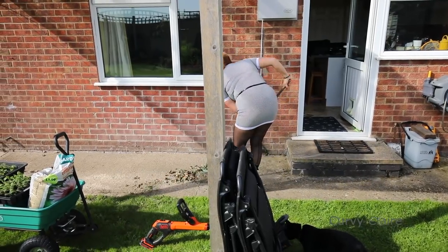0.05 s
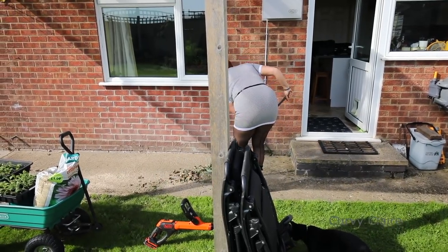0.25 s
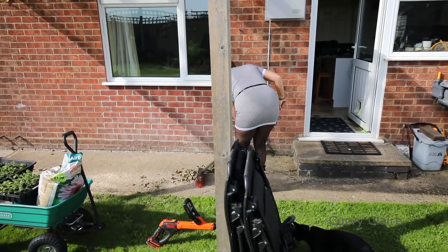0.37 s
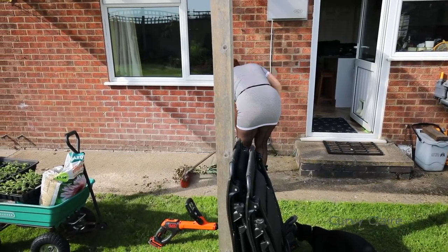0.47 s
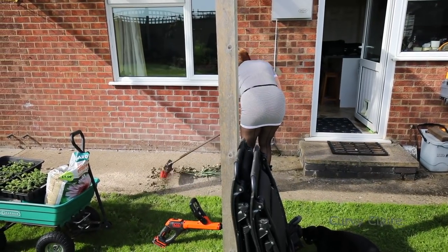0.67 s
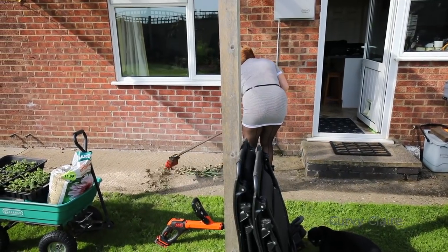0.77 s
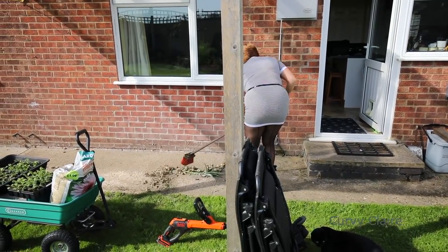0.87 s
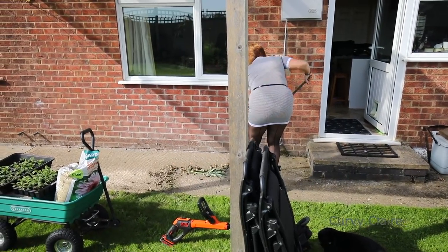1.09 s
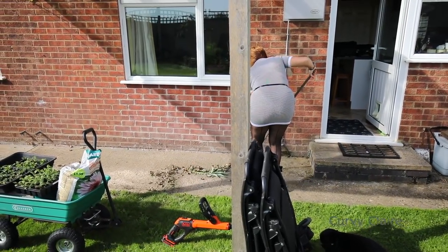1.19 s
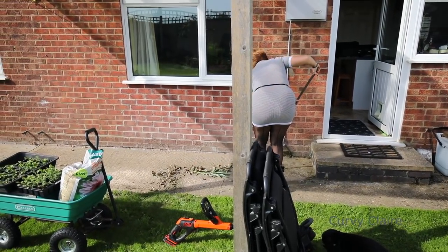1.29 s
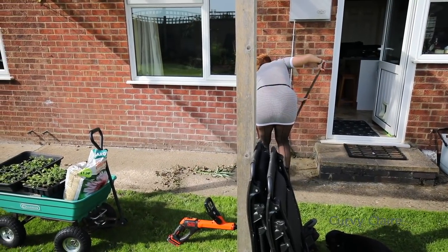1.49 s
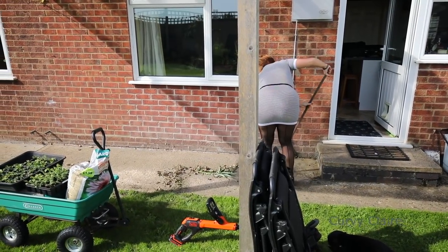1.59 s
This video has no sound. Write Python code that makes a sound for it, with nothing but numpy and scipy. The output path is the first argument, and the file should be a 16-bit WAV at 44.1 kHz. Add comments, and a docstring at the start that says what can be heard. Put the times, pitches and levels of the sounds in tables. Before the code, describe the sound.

One stiff broom stroke on concrete, heard close outdoors. A soft shoe scuff at 0.15 s, then the head lands crunchily at 0.22 s. Bright, dry bristles rasp from 0.24 to 0.7 s, strongest near 0.5, with a faint low judder. Grit skitters and thins out until about 1.1 s. A loud woody tap at 1.36 s rebounds quickly; quiet air continues, with a very faint hoot at 1.5 s.

```python
"""A concrete path beside a house wall, two close microphones: one push of a stiff broom.
A shoe scuffs and the broom head lands, each as a ringing set of modes with a crunch of noise.
Thousands of tiny random clicks make the bristles and the grit skittering on; a wavering tone judders low.
Then a woody tap rebounds and settles, over shaped noise for garden air, a faint drone and a soft hoot."""
import sys
import numpy as np
from scipy import signal
from scipy.fft import rfft, irfft, next_fast_len
from scipy.io import wavfile
from scipy.ndimage import uniform_filter1d

SR = 44100
rng = np.random.default_rng(int(sys.argv[2]) if len(sys.argv) > 2 else 0)


def persist_wave(psi):
    """Save psi, clipped to +-1, as 16-bit WAV."""
    counts = np.round(np.clip(psi, -1, 1) * 32767).astype(np.int16)
    wavfile.write(sys.argv[1], SR, np.atleast_2d(counts).T)


N = 72765
T = np.arange(N) / SR
PADDED = next_fast_len(N + SR // 2)
FREQS = np.maximum(np.arange(PADDED // 2 + 1) * SR / PADDED, 1)


def from_db(db):
    """Decibels to gain."""
    return 10 ** (np.asarray(db) / 20)


def rms_one(x):
    """Scale to unit power, over all channels together."""
    return x / np.sqrt(np.mean(x ** 2) + 1e-20)


def in_time(rows):
    """Draw a table of (s, value) as a curve at every sample."""
    return np.interp(T, *np.transpose(rows))


def over_hz(points):
    """Draw a table of (Hz, value) at every frequency, straight between points on a log axis."""
    hz, value = np.transpose(points)
    return np.interp(np.log(FREQS), np.log(hz), value)


def filtered(x, response):
    """Apply a frequency response."""
    return irfft(rfft(x, PADDED) * response, PADDED)[..., :N]


def drift(rate_hz):
    """Slow random wander with spread 1, rolling off above the given rate."""
    wander = rfft(rng.standard_normal(PADDED)) / (1 + (FREQS / rate_hz) ** 2)
    return rms_one(irfft(wander, PADDED)[:N])


def swell(start, end, rise, fall):
    """Exponential rise up to the start, hold, exponential fall after the end."""
    return np.exp(-np.maximum(start - T, 0) / rise - np.maximum(T - end, 0) / fall)


def bristles():
    """Bristle tips catch and flick free in clumps, as strongly as the broom is pushed."""
    # How hard the bristles scrape. Each row: time in seconds, level in dB before the push gain.
    push_curve = [(0.24, -47), (0.336, -34), (0.484, -32), (0.496, -29), (0.592, -31.5), (0.676, -38),
                  (0.7, -44.5)]
    # Bristles on concrete. Each row: frequency in Hz, density in dB per Hz.
    bristle_colour = [(150, -22), (400, -16), (850, -15), (1250, -8.5), (1600, -3), (2300, -5.5),
                      (3000, -3.5), (3800, 1), (5300, -2), (6500, -2.5), (8000, -4.5), (10000, -11.5),
                      (12700, -8.5), (15500, -15.5)]
    push_gain_db, onset_s, release_s = 3, 0.004, 0.0099
    flicks_per_s, flick_spread_db = 15000, 2.5
    clump_db, clump_rate_hz = .7, 70
    push = from_db(in_time(push_curve) + push_gain_db)
    push = push * swell(push_curve[0][0], push_curve[-1][0], onset_s, release_s)
    flicks = rms_one(tufts(clicks(flicks_per_s, flick_spread_db, bristle_colour)))
    clumps = from_db(clump_db * drift(clump_rate_hz))
    return moving(push * clumps, flicks)


def tufts(x, count=9):
    """Tufts scrape at pitches of their own: each band swells and sinks alone, and the head rings along."""
    # Rings of the broom head. Each row: frequency in Hz, width in Hz, boost in dB.
    head_rings = [(1647, 50, 4), (3256, 30, 3), (3436, 30, 4), (3932, 30, 3), (4304, 30, 4), (6218, 40, 3),
                  (6743, 40, 3)]
    patchy_db, patch_rate_hz = 1.03, 19
    boost_db = sum(db / (1 + (2 * (FREQS - hz) / width) ** 2) for hz, width, db in head_rings)
    body = from_db(boost_db)
    centres = np.log(np.geomspace(700, 15000, count))
    out = 0
    for band in np.eye(count):
        # overlapping bands that together pass everything
        window = np.interp(np.log(FREQS), centres, band)
        out = out + filtered(x, body * window) * from_db(patchy_db * drift(patch_rate_hz))
    return out


def clicks(per_s, spread_db, spectrum):
    """Three unrelated streams of tiny impacts of uneven size, coloured by what they strike; rms 1."""
    sizes = from_db(spread_db * np.minimum(rng.exponential(1, (3, N)), 4))
    signs = rng.choice([-1, 1], (3, N))
    happens = rng.random((3, N)) < per_s / SR
    return rms_one(filtered(sizes * signs * happens, from_db(over_hz(spectrum))))


def judder():
    """The broom shudders on its bristles: a low wandering tone whose octave fades out early."""
    # The shudder. Each row: time in seconds, level in dB before the judder gain.
    judder_curve = [(0.28, -58), (0.294, -59.5), (0.344, -58.5), (0.446, -54.5), (0.492, -59), (0.716, -54),
                    (0.994, -69), (1.0, -79)]
    centre_hz, wander, gain_db = 61.45, 0.017, 3.5  # wander as a share of the pitch
    octave_db, octave_end_s = -5.5, 0.64
    phase = 2 * np.pi * np.cumsum(centre_hz * (1 + wander * drift(6.8))) / SR
    octave = from_db(octave_db) * swell(0, octave_end_s, 1, 0.023) * np.sin(2 * phase)
    level = from_db(in_time(judder_curve) + gain_db)
    level = level * swell(judder_curve[0][0], judder_curve[-1][0], 0.023, 0.09)
    return np.sqrt(2) * level * (np.sin(phase) + octave)


def grit():
    """Swept grit lands in showers and rolls to rest; the powers of all these add."""
    # Showers landing. Each row: start in seconds, level in dB, rise in seconds, fall in seconds.
    shower_rows = [(.219, -35, .002, 0.0037), (0.746, -36, .002, 0.011), (.771, -36.5, 0.0063, .016),
                   (0.81, -34, 0.018, 0.033), (.904, -35, 0.0021, 0.0037), (.959, -39, .007, 0.015)]
    # Loose grit rolling on. Each row: time in seconds, level in dB.
    rolling_curve = [(.66, -60), (.735, -41), (.87, -48), (1.0, -49), (1.1, -56), (1.25, -70)]
    # Grit on concrete. Each row: frequency in Hz, density in dB per Hz.
    grit_colour = [(200, -29), (500, -24), (1000, -14.5), (1650, -5.5), (2200, -8.5), (3100, -7),
                   (4500, 0.5), (5500, -5.5), (6400, -2.5), (7900, -6), (9800, -16), (12500, -15),
                   (15500, -18)]
    grains_per_s, grain_spread_db, hold_s = 9000, 2.7, .007
    rolling = from_db(in_time(rolling_curve)) * swell(rolling_curve[0][0], rolling_curve[-1][0], .02, .05)
    power = rolling ** 2
    for s, db, rise, fall in shower_rows:
        power = power + (from_db(db) * swell(s, s + hold_s, rise, fall)) ** 2
    return moving(np.sqrt(power), clicks(grains_per_s, grain_spread_db, grit_colour))


def shoe():
    """A shoe is set down: several soft contacts ring its modes."""
    # Contacts. Each row: start in seconds, level in dB, tilt in dB per octave.
    step_rows = [(.134, -43.5, -1.4), (.1452, -36.5, 0.39), (.158, -45, -1.3), (.172, -46.5, -2)]
    # Modes. Each row: frequency in Hz, level in dB, 60 dB decay in seconds.
    shoe_modes = [(336, -10.5, 0.15), (364, -3, 0.054), (460, -2.5, 0.047), (540, 1, 0.059),
                  (820, 6, 0.0098), (1130, 1, 0.025)]
    return struck(step_rows, shoe_modes, build_s=0.00049, crunch_db=-31, crunch_fall_s=0.0055)


def broom_head():
    """The broom head lands: quick contacts with a strong crunch ring its modes."""
    # Contacts. Each row: start in seconds, level in dB, tilt in dB per octave.
    landing_rows = [(.2180, -36.5, 2), (.2245, -41, 7.5), (.233, -53, -4)]
    # Modes. Each row: frequency in Hz, level in dB, 60 dB decay in seconds.
    head_modes = [(367, -20, 0.08), (407, 4, 0.029), (553, -0.5, 0.05), (1570, -6, .018), (1755, 2, 0.024),
                  (2210, -2, 0.017), (3450, -5, 0.022), (4060, -9, 0.013)]
    return struck(landing_rows, head_modes, build_s=0.00017, crunch_db=-5.5, crunch_fall_s=0.0083)


def woody_tap():
    """A woody tap rebounds and settles: a strong contact, then weaker ones."""
    # Contacts. Each row: start in seconds, level in dB, tilt in dB per octave.
    tap_rows = [(1.3580, -18, 0.5), (1.3635, -34, -1), (1.3785, -33, -14), (1.3835, -29.5, -11.5),
                (1.388, -45, -8)]
    # Modes. Each row: frequency in Hz, level in dB, 60 dB decay in seconds.
    wood_modes = [(397, -25.5, 0.019), (556, -23.5, 0.061), (762, -18.5, 0.044), (1356, -4, 0.016),
                  (1477, -2.5, .013), (2270, -15.5, 0.019), (3190, -14, 0.0098), (4120, -16, 0.0098)]
    return struck(tap_rows, wood_modes, build_s=0.0013, crunch_db=-14, crunch_fall_s=0.0044)


def struck(hits, modes, build_s, crunch_db, crunch_fall_s):
    """Each hit builds up, rings all the modes of a body, brighter or duller, and crunches briefly."""
    # Crunch of a contact. Each row: frequency in Hz, density in dB per Hz.
    crunch_colour = [(120, -9), (400, 7), (1500, 2), (2100, -11), (3600, 4), (5000, -7), (8000, -12.5),
                     (15000, -43)]
    mode_spread_db, tilt_centre_hz = 2, 980
    noise = filtered(rng.standard_normal(N), from_db(over_hz(crunch_colour)))
    crunch = from_db(crunch_db) * rms_one(noise)
    hz, mode_db, t60 = np.transpose(modes)[..., None]
    out = np.zeros(N)
    for s, db, tilt in hits:
        age = np.clip(T - s, 0, .5)
        uneven_db = mode_spread_db * rng.standard_normal(hz.shape)
        strength_db = mode_db + tilt * np.log2(hz / tilt_centre_hz) + uneven_db
        ring = np.sum(from_db(strength_db - 60 * age / t60) * np.sin(2 * np.pi * hz * age), axis=0)
        build_up = 1 - np.exp(-age / build_s)
        out += from_db(db) * build_up * (ring + crunch * np.exp(-age / crunch_fall_s))
    return out


def flex():
    """The broom flexes as it lands, with a low thump."""
    return ping(.212, hz=66, db=-31, rise=.03, fall=.018)


def stone_chip():
    """A chip of stone pings very high."""
    return ping(1.026, hz=14050, db=-43, rise=.003, fall=.004)


def ping(s, hz, db, rise, fall):
    """One mode that builds up and dies; the level is that before build-up and decay."""
    age = np.maximum(T - s, 0)
    return from_db(db) * (1 - np.exp(-age / rise)) * np.exp(-age / fall) * np.sin(2 * np.pi * hz * age)


def yard(x):
    """A knock at one spot, with its short tail from wall and ground."""
    t60_s, delay_s, scatter_db = 0.25, 0.0018, 6
    tail = rng.standard_normal((2, N)) * from_db(-60 * T / t60_s) * (T > delay_s)
    tail = rfft(tail, PADDED)
    # level the broad colour of the tail, keeping its fine structure
    tail /= np.sqrt(uniform_filter1d(np.abs(tail) ** 2, size=1000, axis=1))
    return microphones(x, filtered(x, tail), scatter_db)


def moving(level, streams):
    """Impacts along a moving front: their scatter never repeats and trails the level slightly."""
    smear_s = 0.019
    keep = np.exp(-1 / (smear_s * SR))
    trailing = np.sqrt(signal.lfilter([1 - keep], [1, -keep], level ** 2 + 1e-18))
    return microphones(level * streams[0], trailing * streams[1:], 0)


def microphones(direct, scattered, scatter_db):
    """Two close microphones: direct sound leads in phase at the left, scatter differs at each."""
    # Level between the microphones. Each row: frequency in Hz, left minus right in dB.
    path_balance = [(100, -2.5), (600, -9.5), (1000, -10), (1600, -6.5), (3300, -9.5), (4200, -7),
                    (5300, 0.5), (6600, -1.5), (8200, -1.5), (10000, -5.5), (13000, -5.5), (15500, -19)]
    # Phase between the microphones. Each row: frequency in Hz, lead of the left in radians.
    left_lead = [(100, 0.116), (2200, 0.6), (3400, 0.41), (3800, 1.83), (5100, 2.27), (5800, 3.26),
                 (6300, 4.76), (7600, 5.07), (10300, 5.5), (13000, 5), (15000, 5.8)]
    # Scatter off wall and ground. Each row: frequency in Hz, dB against direct before scatter_db.
    scatter_colour = [(100, 11), (500, -16), (1600, -13.5), (2600, -2), (4500, -4), (5700, -3), (8000, 6.5),
                      (9800, -2.5), (11500, 6), (15000, -14)]
    wet = from_db(over_hz(scatter_colour) + scatter_db)
    gain = sides(path_balance) / np.sqrt(1 + wet ** 2)
    lead = np.exp(1j * over_hz(left_lead) * np.array([[1], [0]]))
    return filtered(direct, gain * lead) + filtered(scattered, gain * wet)


def sides(balance):
    """Left and right gains of equal total power."""
    gains = from_db(over_hz(balance) * np.array([[.5], [-.5]]))
    return gains / np.sqrt(np.mean(gains ** 2, axis=0))


def garden():
    """Quiet outdoor air: shaped noise, partly alike at both microphones, that swells and flickers."""
    # Colour of the air. Each row: frequency in Hz, relative density in dB per Hz.
    air_colour = [(15, -32), (25, -9), (79, -2.5), (152, -11), (227, -9.5), (260, -9), (359, -9.5),
                  (399, -13.5), (523, -7.5), (741, -8.5), (1050, -7.5), (1800, -15.5), (6050, -20.5),
                  (7700, -28), (15500, -35.5)]
    # Slow swell. Each row: time in seconds, change in dB.
    air_swell = [(0, 1.5), (.6, 0), (1.2, 2.5), (1.48, 0), (1.65, 1)]
    # Left-right likeness. Each row: frequency in Hz, correlation from -1 to 1.
    air_likeness = [(60, 0.4), (200, 0.37), (600, .5), (1500, 0.66), (4000, 0.45), (12000, -0.1449)]
    # Level between the microphones. Each row: frequency in Hz, left minus right in dB.
    air_balance = [(60, 2), (300, 3.5), (700, 5.5), (2000, 3.5), (5000, -0.5), (12000, 0.5)]
    base_db, flicker_db = -50.5, 1.5
    mid, side = rng.standard_normal((2, N))
    alike = np.clip(over_hz(air_likeness), -.95, .95)
    colour = from_db(over_hz(air_colour)) * sides(air_balance)
    width = np.sqrt((1 - alike) / (1 + alike))
    air = filtered(mid, colour) + filtered(side, colour * width) * [[1], [-1]]
    return rms_one(air) * from_db(base_db + in_time(air_swell) + flicker_db * drift(5))


def drone():
    """A faint wavering drone: noise narrowed to a resonance."""
    hz, width_hz, level_db = 170.8, 8, -68.5
    resonance = 1 / (1 + ((FREQS - hz) / width_hz) ** 2)
    return from_db(level_db) * rms_one(filtered(rng.standard_normal(N), resonance))


def hoot():
    """One faint far hoot: a short tone of slightly wavering pitch with soft edges."""
    start_s, end_s, edge_s = 1.495, 1.545, 0.0048
    centre_hz, waver, level_db = 532, 0.0095, -53.5  # waver as a share of the pitch
    phase = 2 * np.pi * np.cumsum(centre_hz * (1 + waver * drift(26))) / SR
    return from_db(level_db) * swell(start_s, end_s, edge_s, edge_s) * np.sin(phase)


def scene():
    """Sweeping and knocks on the path, in the garden."""
    sweep = bristles() + judder() + flex() + grit() + stone_chip()
    knocks = yard(shoe() + broom_head() + woody_tap())
    return sweep + knocks + garden() + drone() + hoot()


def record(dry):
    """The top is cut steeply."""
    cutoff_hz = 15750
    return filtered(dry, 1 / np.sqrt(1 + (np.minimum(FREQS / cutoff_hz, 1.1)) ** 600))


dry = scene()
out = record(dry)
persist_wave(out)
```